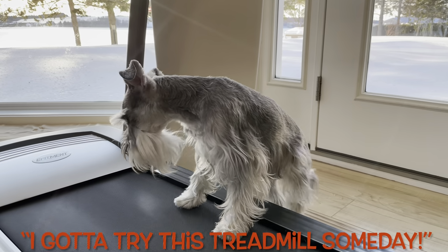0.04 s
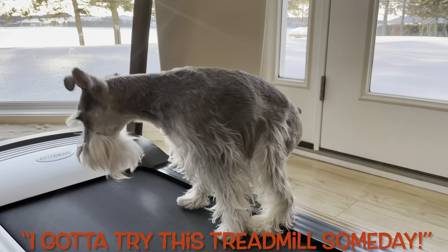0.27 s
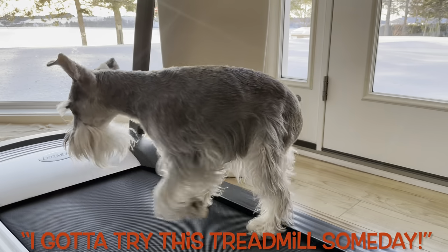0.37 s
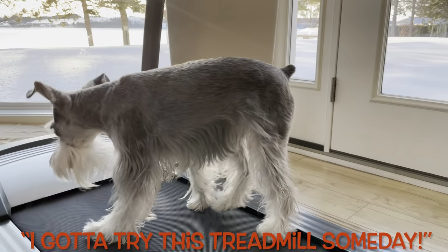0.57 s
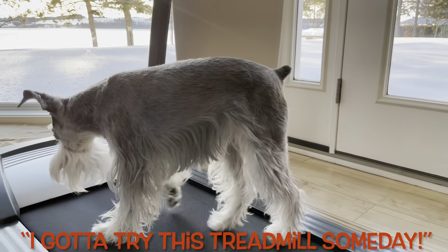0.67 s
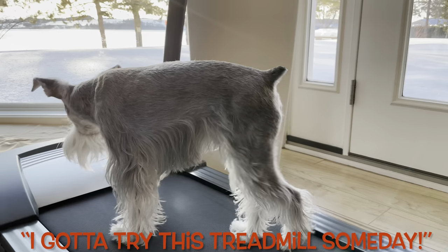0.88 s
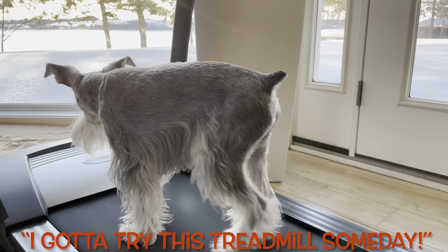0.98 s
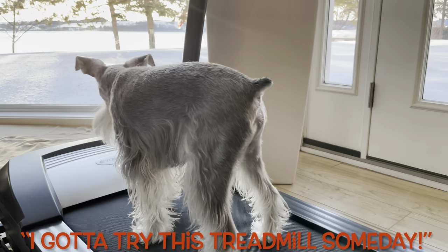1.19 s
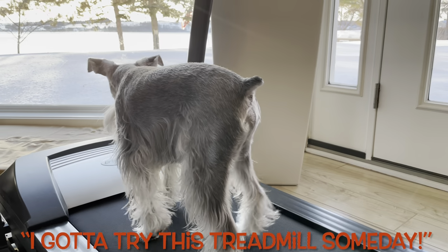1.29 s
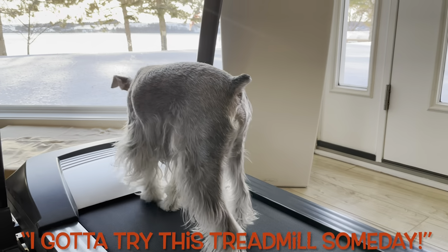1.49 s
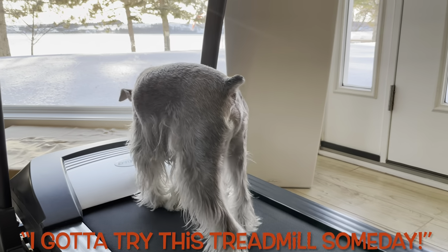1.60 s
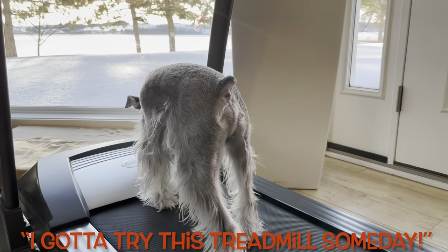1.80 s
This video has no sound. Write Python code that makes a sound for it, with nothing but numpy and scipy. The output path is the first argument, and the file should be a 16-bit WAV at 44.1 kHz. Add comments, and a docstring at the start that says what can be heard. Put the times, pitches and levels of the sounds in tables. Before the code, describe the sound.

Close by in a quiet room, a dog's paws tap and thud irregularly on a still treadmill. A quick cluster of sharp claw clicks and hollow knocks comes first, followed by softer steps and faint scuffs.

```python
"""A quiet room, close to a stopped treadmill on which a small dog steps about.
Claws click on the belt and ring the side rail, flat pads knock the board under the belt,
the dog's weight thumps the hollow deck, and furry paws brush over the belt.
The room adds first reflections, a short tail and a low, steady background."""
import sys
import numpy as np
from scipy import signal
from scipy.fft import rfft, irfft
from scipy.io import wavfile
from scipy.ndimage import map_coordinates

SR = 44100
rng = np.random.default_rng(int(sys.argv[2]) if len(sys.argv) > 2 else 0)


def wav_out(sig):
    """Save sig, one row per channel (or a flat mono array), as 16-bit PCM at SR to the path in sys.argv[1]."""
    wavfile.write(sys.argv[1], SR, np.round(np.clip(np.atleast_2d(sig).T, -1, 1) * 32767).astype(np.int16))


N = 81585


def undb(db):
    """Decibels to gain."""
    return 10 ** (np.asarray(db) / 20)


def unit(x):
    """Scale to unit energy."""
    return x / np.sqrt(np.mean(np.sum(x ** 2, axis=-1)))


def clock(size=N):
    """Sample times in s."""
    return np.arange(size) / SR


def fade(t60_s, size):
    """Exponential decay."""
    return np.exp(-np.log(1000) * clock(size) / max(t60_s, 1e-3))


def colour(x, points):
    """Minimum-phase filter through (f/Hz, gain/dB) points."""
    hz, db = np.array(sorted(points), float).T
    size = 4096
    bins_hz = np.maximum(np.arange(size // 2 + 1) * SR / size, 1)
    gain = undb(np.interp(np.log(bins_hz), np.log(hz), db))
    cepstrum = irfft(np.log(gain))
    cepstrum[1:size // 2] *= 2
    cepstrum[size // 2 + 1:] = 0
    response = irfft(np.exp(rfft(cepstrum)))
    return signal.fftconvolve(np.atleast_2d(x), response[None], axes=-1)[:, :x.shape[-1]]


def ring(modes, size):
    """Struck modes (f/Hz, level/dB, t60/s) of alternating sign, at unit energy."""
    t = clock(size)
    return unit(sum((-1) ** k * undb(db) * np.sin(2 * np.pi * hz * t) * fade(t60_s, size)
                    for k, (hz, db, t60_s) in enumerate(modes)))


def noise(side_db, size):
    """Stereo white noise; side_db sets the width."""
    mid, side = rng.standard_normal((2, size))
    return mid + undb(side_db) * side * np.array([[1], [-1]])


def burst(spectrum, t60_s, side_db, size):
    """Dense ringing: decaying coloured noise at unit energy."""
    return unit(colour(noise(side_db, size) * fade(t60_s, size), spectrum))


def hiss(spectrum, side_db):
    """Steady coloured noise at rms 1."""
    return unit(colour(noise(side_db, N), spectrum)) * np.sqrt(N)


def add(out, start_s, sound, pan_db=0):
    """Mix a sound in; pan is left minus right."""
    i = int(np.clip(start_s * SR, 0, N - 1))
    out[:, i:i + sound.shape[-1]] += sound[..., :N - i] * undb([[pan_db / 2], [-pan_db / 2]])


# claw taps: t/s, level/dB, knock/dB, brightness/dB, sparkle/dB, t60/s, struck spot f/Hz, pan/dB
CLAW_TAPS = [(.004, -29.5, 2.5, -9, 3, 0.047, 1200, 12.5), (.130, -24, 8, -11, -9, 0.048, 1907, 6.5),
             (0.2182, -4, -12.5, -2.5, -15, 0.023, 1800, -2.5), (.2195, -20.5, 1, 4, -17, 0.021, 4340, 12),
             (.232, -25, 22, 9, 11, 0.032, 3410, 6.5), (0.3172, -15, 0, -0.5, -7, 0.048, 1875, 2.5),
             (.344, 0.5, 7, 0.5, 0.5, 0.042, 1093, 1.5), (.387, -29, 19.5, -18, -28, 0.14, 760, -2),
             (0.549, -7, 2, 5.5, 5, 0.023, 1715, 2.5), (.5505, -23, 7, -1, 11, 0.04, 5210, -2),
             (.563, -16, 13.5, -3, 1.5, 0.097, 1148, -3.5), (.617, -9, -0.5, 3, -4.5, 0.068, 1609, 3.5),
             (.63, -20, 19, -9, -8, 0.023, 880, -1), (.848, -32.5, -4, -7, -0.5, 0.043, 1106, 10),
             (1.053, -29.5, 10.5, -5, -3, 0.027, 1280, 4.5), (1.087, -35.5, 8, 1, -13, .05, 2060, 6),
             (1.096, -30.5, 13, -26, 8, 0.03, 1200, -2), (1.114, -13.5, 5, -2, -10, 0.027, 1266, 0),
             (1.159, -26.5, 14, -39, 1, 0.046, 1155, -7), (1.319, -19.5, -44, 6.5, 1, 0.038, 1600, 2),
             (1.3324, -13, -8, 6.5, 4, 0.028, 1668, 0.5), (1.336, -15.5, -8.5, -1, 3, 0.04, 3557, 5.5),
             (1.345, -15.5, -8, -36, -21, 0.11, 1596, -8), (1.38, -17.5, -0.5, -10.5, -8, 0.12, 1212, 5),
             (1.535, -33.5, -4, 11.5, 5, 0.02, 2770, -3), (1.647, -37, 16, -4, -9, 0.042, 993, 10),
             (1.731, -33.5, -9, -3, 11, 0.03, 1380, 5), (1.763, -24, -15, -6.5, -10, 0.088, 1995, 4)]
# belt and rail modes: f/Hz, level/dB, t60/tap t60
RAIL_MODES = [(755, -9.5, 3.05), (1065, 9.5, 0.3), (1129, 5, 1.06), (1244, 2.5, 0.65), (1638.5, 4.5, 1.3),
              (1854, -10.5, 0.71), (2593, -14.5, 3.6), (2953, 4.5, 0.65), (3489, -6, 1.1),
              (3920, -8.5, 1.8), (4240, -26, 0.43), (5010, -27, 2.4)]
# contact crack: f/Hz, density/dB
CRACK_SPECTRUM = [(150, -47), (500, -17.5), (850, -1), (1800, 2), (2400, -7.5), (3300, -8.5), (4800, -12),
                  (6000, -20.5), (9000, -31), (12000, -28.5), (16000, -42.5)]
# bands for a tap's knock, level, brightness and sparkle: f/Hz
TAP_BANDS_HZ = [650, 1500, 4000, 9000]

def claws(attack_s=0.0023, spot_db=10, rail_db=1, scatter_db=1, crack_db=2):
    """Each claw cracks and rings the rail, coloured by where and how hard it lands."""
    out, size = np.zeros((2, N)), SR // 10
    attack = 1 - np.exp(-clock(size) / attack_s)
    for start_s, db, knock_db, bright_db, sparkle_db, t60_s, spot_hz, pan_db in CLAW_TAPS:
        modes = [(hz, mode_db + scatter_db * rng.standard_normal(), share * t60_s)
                 for hz, mode_db, share in RAIL_MODES]
        modes.append((spot_hz, spot_db, t60_s))
        rail = undb(rail_db) * ring(modes, size)
        crack = undb(crack_db) * burst(CRACK_SPECTRUM, t60_s, side_db=-2, size=size)
        bands_db = [db + knock_db, db, db + bright_db, db + sparkle_db]
        tap = colour((rail + crack) * attack, zip(TAP_BANDS_HZ, bands_db))
        add(out, start_s, tap, pan_db)
    return out


# pad slaps: t/s, level/dB, pan/dB
PAD_SLAPS = [(.513, -1.5, 2.5), (.679, -32.5, 10), (1.535, -18, 4)]
# board modes: f/Hz, level/dB, t60/s
BOARD_MODES = [(565, -3, 0.27), (619.6, -7.5, 0.16), (675, -8.5, 0.1), (757, 1, 0.029), (812.6, 0.5, 0.037),
               (1142, 0.5, 0.069), (880, 3, 0.02)]
# slap noise: f/Hz, density/dB
SLAP_SPECTRUM = [(40, -37), (150, 4), (400, -10), (850, 11), (1200, -11.5), (1600, -13.5), (3500, -21.5),
                 (6000, -40.5), (14000, -43)]

def pad_slaps(smack_db=-0.5):
    """A flat pad knocks the board under the belt."""
    out, size = np.zeros((2, N)), SR // 4
    board = ring(BOARD_MODES, size)
    for start_s, db, pan_db in PAD_SLAPS:
        smack = undb(smack_db) * burst(SLAP_SPECTRUM, t60_s=0.18, side_db=-1.5, size=size)
        add(out, start_s, undb(db) * (board + smack), pan_db)
    return out


# weight landing on the deck: t/s, level/dB, push length/s (1 ms floor applied), bass/dB
FOOTFALLS = [(.02, -27.5, 0.0015, -23), (0.137, -16.5, 0.00067, -9), (0.174, -16, 0.0059, 3),
             (.231, -3, 0.0016, 8.5), (.242, -3, 0.0037, 8), (0.275, -1.5, 0.0051, 7),
             (0.376, -17, 0.0027, 9), (0.416, -32, 0.013, 10), (0.512, -3.5, 0.0022, 6),
             (.5345, 1.5, 0.0029, -3), (0.581, -10, 0.0011, -13), (0.656, -20, 0.0025, -2),
             (.72, -12, 0.009, 1.5), (.852, -17, 0.0021, -13), (0.956, -34, 0.002, 5),
             (1.066, -6, 0.0053, -3.5), (1.121, -9, 0.00099, -1), (1.142, -13.5, 0.0036, 6.5),
             (1.205, -22.5, 0.0053, 11), (1.274, -12, 0.004, -19.5), (1.535, -16.5, 0.00087, -2),
             (1.575, -18.5, 0.0014, -10), (1.662, -22, 0.0022, 0), (1.791, -48, 0.0062, 8)]
# deck modes: f/Hz, level/dB, t60/s
DECK_MODES = [(51.8, -29.5, 0.21), (84.8, -9, 0.33), (111.3, -10, 0.2), (140.3, -1, 0.2), (182, -0.5, 0.32),
              (207, -7.5, 0.27), (220.2, -7, 0.24), (262, 1.5, 0.11), (310.4, -10, 0.33),
              (339.6, -10, 0.19), (379.6, -23.5, 0.033), (504, -9.5, 0.058)]
# frame shudder: f/Hz, density/dB
SHUDDER_SPECTRUM = [(25, -29), (80, -4.5), (160, -5), (250, -3.5), (350, -6), (500, -9.5), (900, -16.5),
                    (3000, -71)]

def deck_thumps(shudder_db=-2, bass_shelf_hz=(79, 160)):
    """A soft push booms the deck and shakes the frame; longer pushes sound duller."""
    out, size = np.zeros((2, N)), SR // 3
    deck, t = ring(DECK_MODES, size), clock(size)
    for start_s, db, push_s, bass_db in FOOTFALLS:
        push = np.sin(np.pi * np.minimum(t / max(push_s, 1e-3), 1)) ** 2
        shudder = undb(shudder_db) * burst(SHUDDER_SPECTRUM, t60_s=0.52, side_db=-7.5, size=size)
        boom = signal.fftconvolve(deck + shudder, push[None] / push.sum(), axes=-1)[:, :size]
        add(out, start_s, colour(boom, zip(bass_shelf_hz, [db + bass_db, db])))
    return out


# paw strokes: centre t/s, half length/s, scrape/dB, fur/dB
PAW_STROKES = [(0.014, 0.032, -61.5, -74.5), (0.232, 0.016, -46, -62.5), (0.3, 0.12, -53.5, -72),
               (.445, 0.06, -56.5, -100), (0.709, 0.032, -48.5, -65), (0.862, 0.042, -59.5, -75.5),
               (1.124, 0.039, -53, -76), (1.349, 0.022, -49, -70), (1.478, 0.12, -67.5, -107),
               (1.675, 0.15, -64.5, -78.5), (1.772, 0.014, -75, -76)]
# pad scrape: f/Hz, density/dB
SCRAPE_SPECTRUM = [(200, 2.5), (800, 4), (1500, 0.5), (2400, -4), (4500, -29), (7000, -31), (15000, -48)]
# fur hiss: f/Hz, density/dB
FUR_SPECTRUM = [(500, 7), (3500, 7.5), (6000, 2.5), (9000, -13), (12000, 8), (14000, -3.5), (16000, -17)]

def paw_brushes(grain_db=2.5, grain_s=0.0018):
    """Pads scrape grainily over the belt while the fur hisses."""
    out, t = np.zeros((2, N)), clock()
    samples = np.arange(N)
    roughness = np.interp(samples / int(grain_s * SR), samples, rng.standard_normal(N))
    grain = undb(grain_db * roughness)
    scrape = grain * hiss(SCRAPE_SPECTRUM, side_db=0.5)
    fur = np.sqrt(grain) * hiss(FUR_SPECTRUM, side_db=-6)
    for centre_s, half_s, scrape_db, fur_db in PAW_STROKES:
        swell = np.exp(-((t - centre_s) / half_s) ** 2 / 2)
        out += swell * (undb(scrape_db) * scrape + undb(fur_db) * fur)
    return out


# console, floor and wall reflections: delay/s, gain/dB
FIRST_REFLECTIONS = [(.0029, -18), (.0064, -17), (.0112, -14)]

def with_reflections(x):
    """Near surfaces add quick, channel-swapped copies that hollow out each tap."""
    out = x.copy()
    for delay_s, db in FIRST_REFLECTIONS:
        add(out, delay_s, undb(db) * x[::-1])
    return out


# room decay: f/Hz, t60/s
TAIL_DECAY = [(100, 0.74), (250, 1), (600, 1), (1400, 0.77), (3700, 0.49), (10000, 0.17)]
# room colour: f/Hz, gain/dB
TAIL_SPECTRUM = [(60, -4), (180, -4), (300, -7), (450, -7), (900, -5), (2000, -7), (5000, -1), (14000, 8.5)]
# room width: f/Hz, side re mid/dB
TAIL_WIDTH = [(130, -15.5), (260, -4.5), (1000, -0.5)]

def room_tail(x, level_db=-9.5, onset_s=0.0062):
    """Diffuse tail, shorter in the treble and narrower in the bass."""
    size = 2 * SR // 3
    bins_hz = np.maximum(np.arange(size // 2 + 1) * SR / size, 1)
    bands_hz, t60s_s = np.array(TAIL_DECAY).T
    white, tail = rfft(rng.standard_normal((2, size))), 0
    for selector, t60_s in zip(np.eye(len(bands_hz)), t60s_s):
        band = np.interp(np.log(bins_hz), np.log(bands_hz), selector)
        tail += irfft(white * band, size) * fade(t60_s, size)
    onset = 1 - np.exp(-(clock(size) / onset_s) ** 2)
    mid, side = colour(tail * onset, TAIL_SPECTRUM)
    response = unit(mid + colour(side, TAIL_WIDTH) * np.array([[1], [-1]]))
    return undb(level_db) * signal.fftconvolve(x.mean(0)[None], response, axes=-1)[:, :N]


# room background: f/Hz, density/dB
BACKGROUND_SPECTRUM = [(15, -25), (25, -10), (54, 1.5), (216, 1.5), (366, -5.5), (441, -20.5),
                       (1140, -19.5), (2440, -31), (4960, -31), (5660, -42.5), (6130, -31.5), (7570, -36.5),
                       (13500, -43.5)]

def background(rms_db=-55.5):
    """Low, steady room noise."""
    return undb(rms_db) * hiss(BACKGROUND_SPECTRUM, side_db=-1.5)


def scene(left_lag_s=0.00009):
    """The steps reach the right channel slightly first; the room surrounds them."""
    steps = with_reflections(claws() + pad_slaps()) + deck_thumps()
    left = map_coordinates(steps[0], [(clock() - left_lag_s) * SR])
    return np.array([left, steps[1]]) + room_tail(steps) + paw_brushes() + background()


def record(dry, cutoff_hz=15600):
    """Steep elliptic low-pass."""
    return signal.sosfilt(signal.ellip(8, .2, 70, cutoff_hz, fs=SR, output="sos"), dry)


dry = scene()
out = record(dry)
wav_out(out)
```